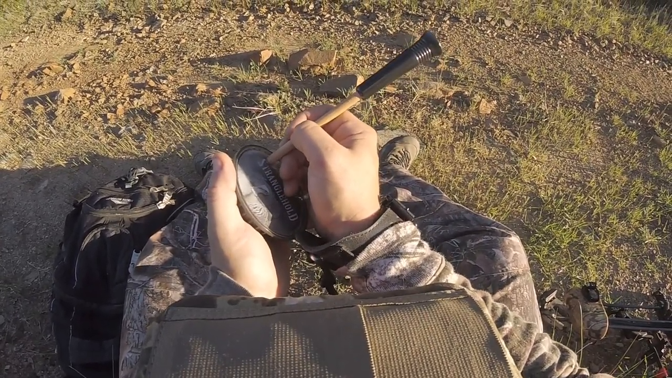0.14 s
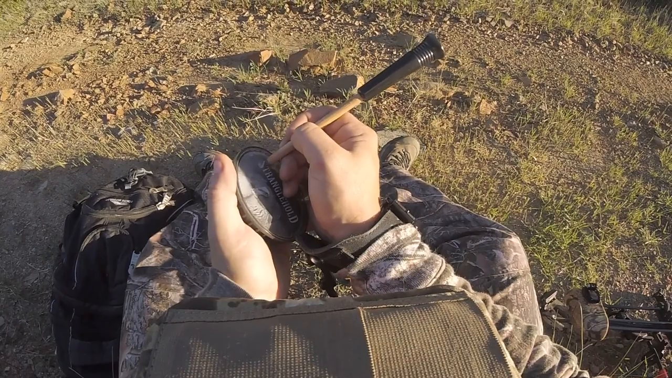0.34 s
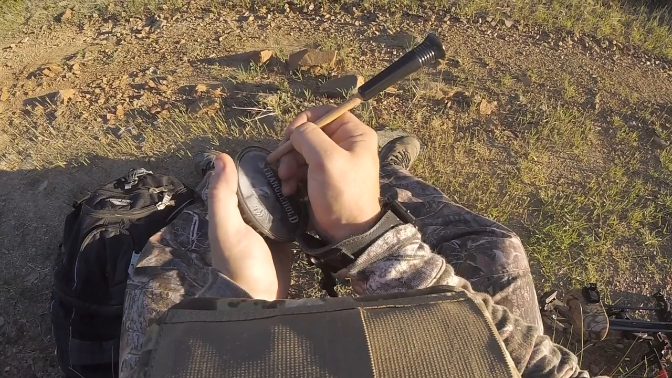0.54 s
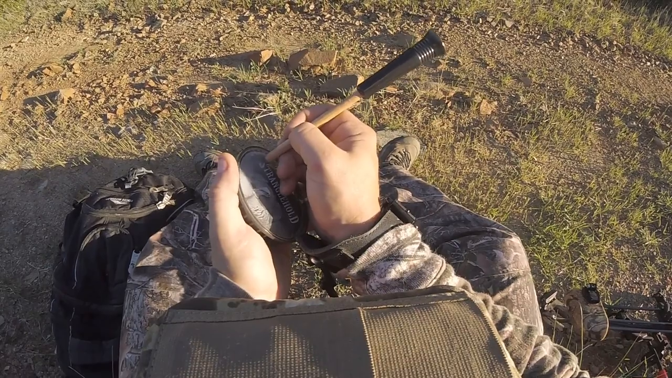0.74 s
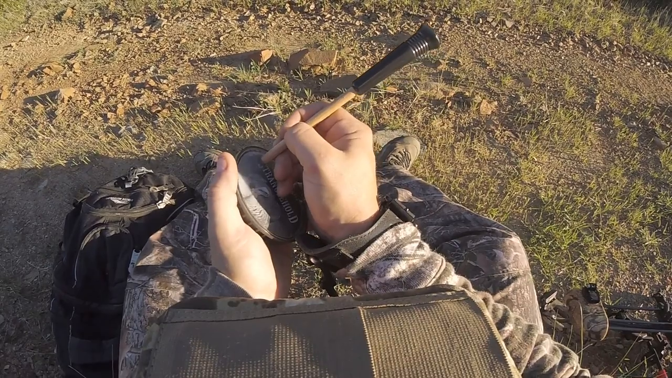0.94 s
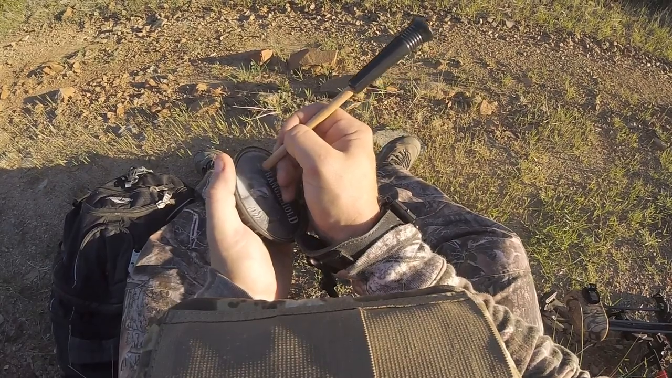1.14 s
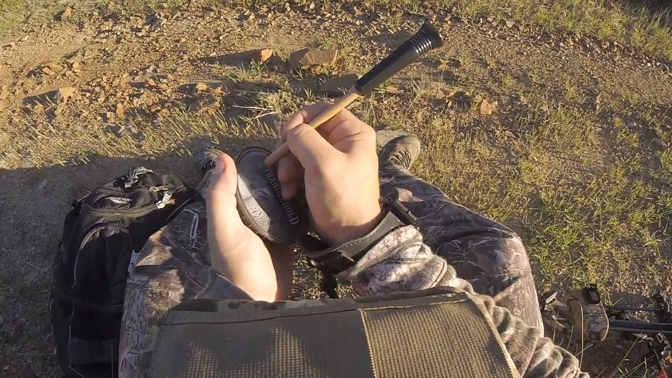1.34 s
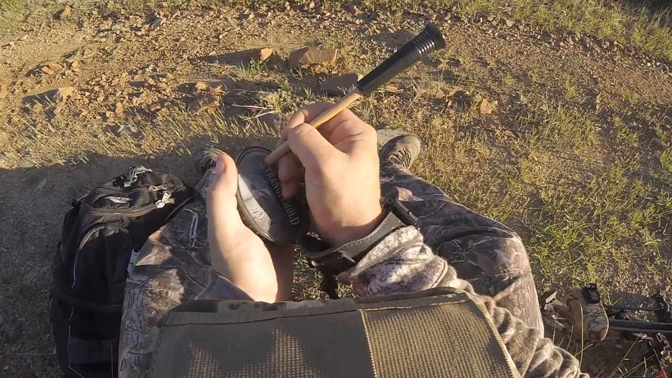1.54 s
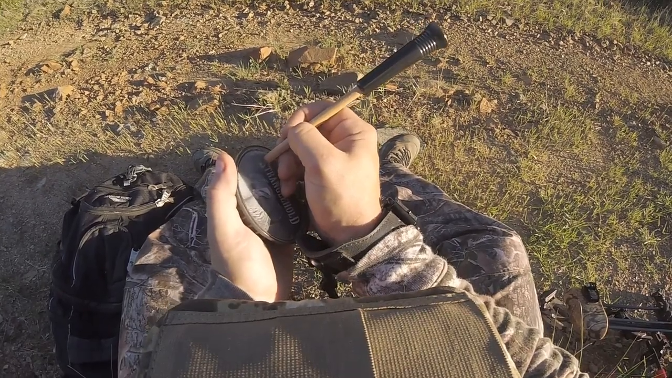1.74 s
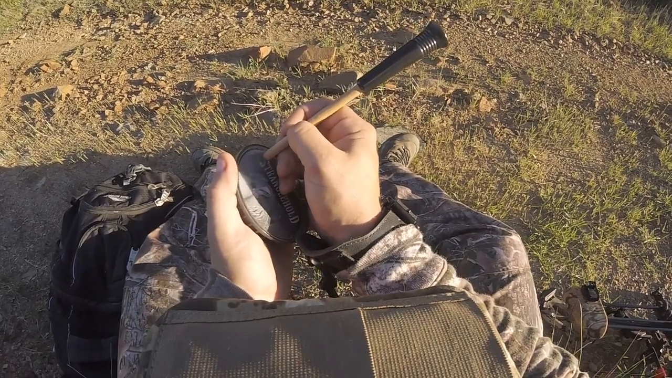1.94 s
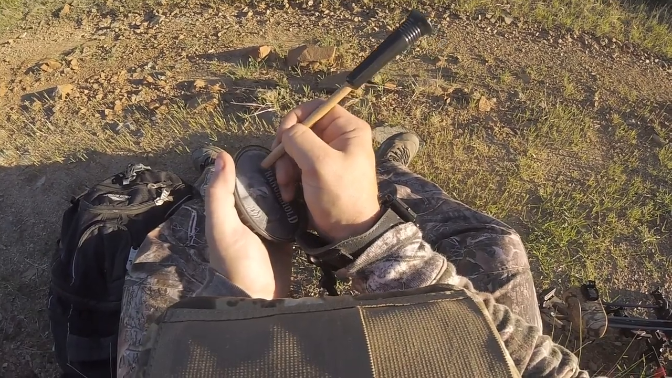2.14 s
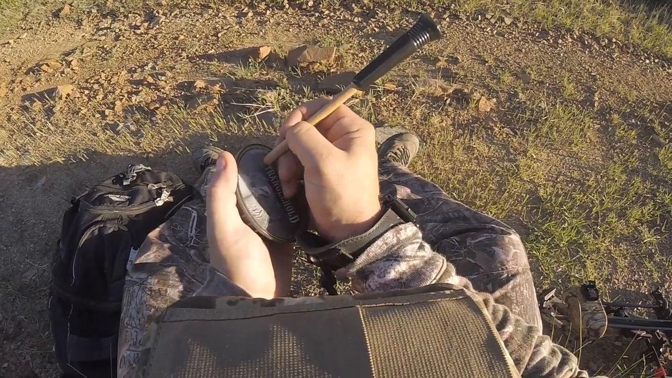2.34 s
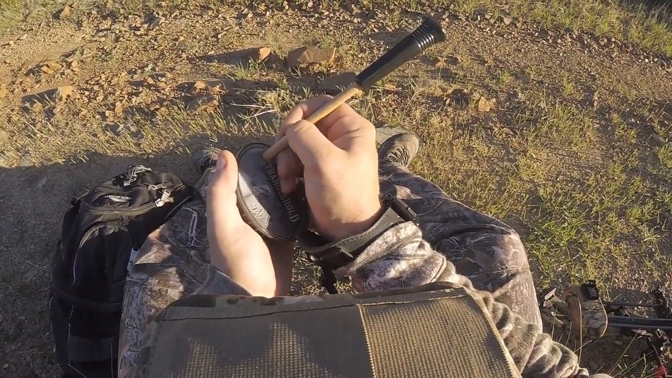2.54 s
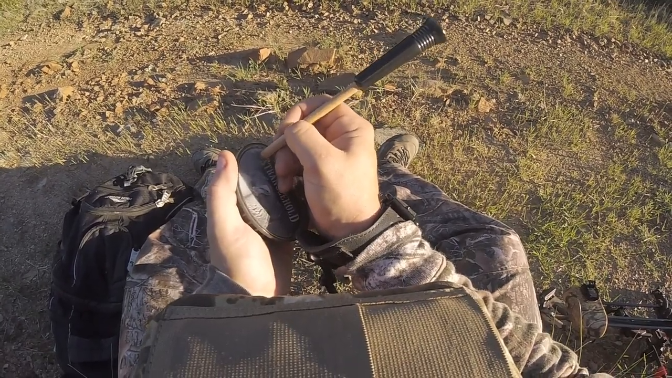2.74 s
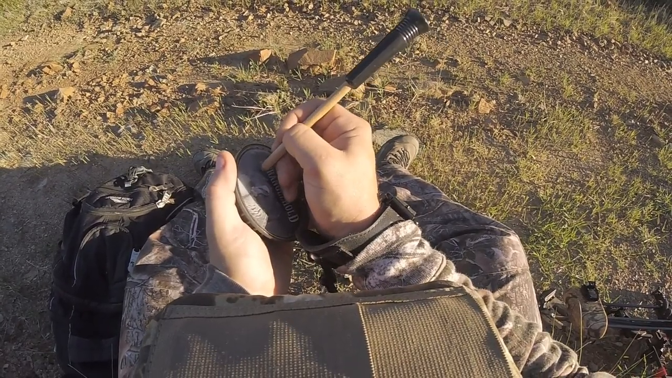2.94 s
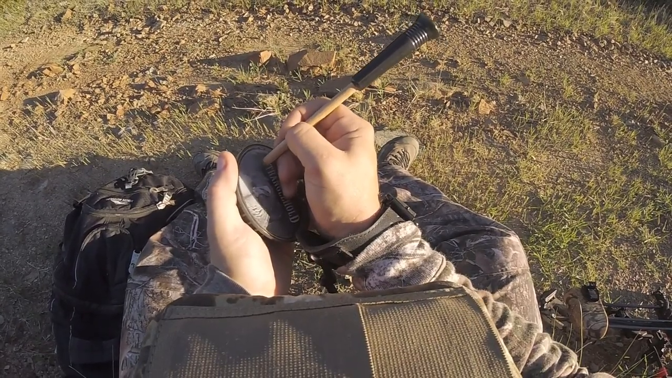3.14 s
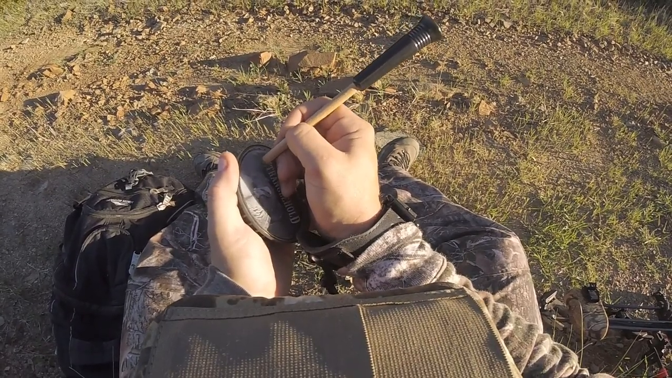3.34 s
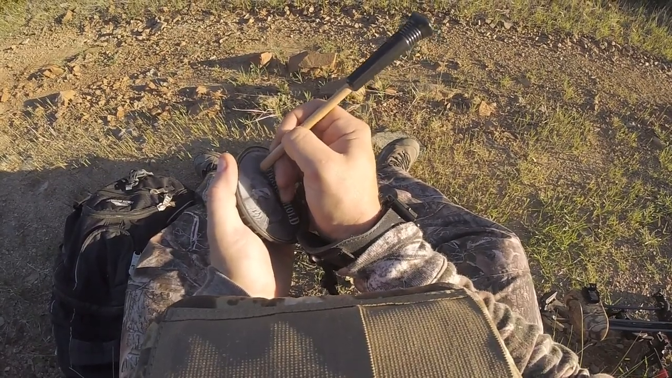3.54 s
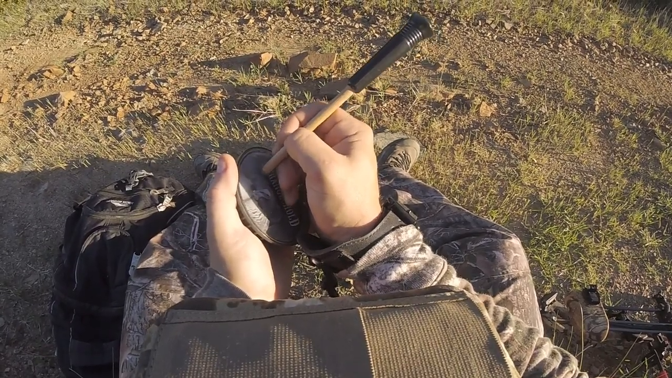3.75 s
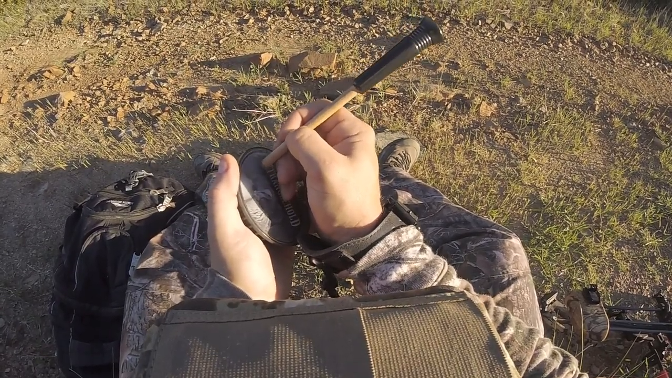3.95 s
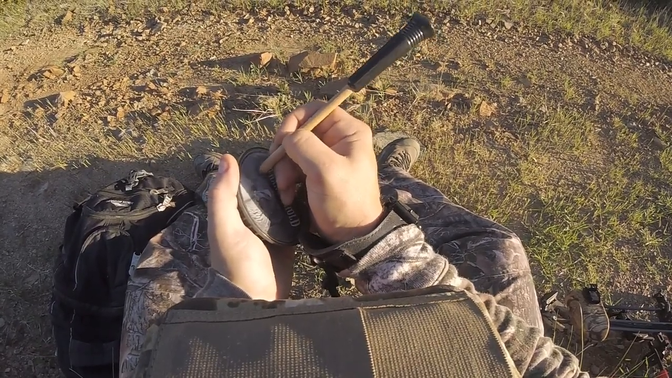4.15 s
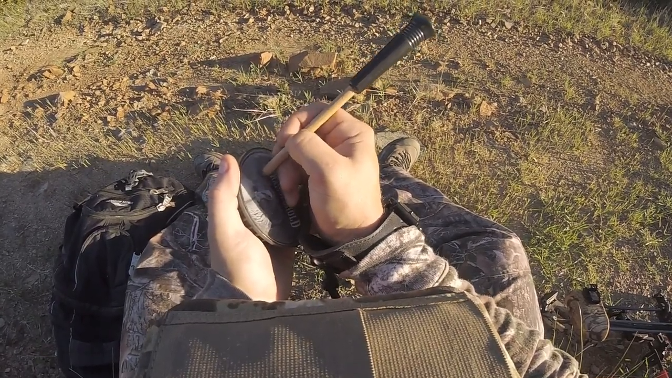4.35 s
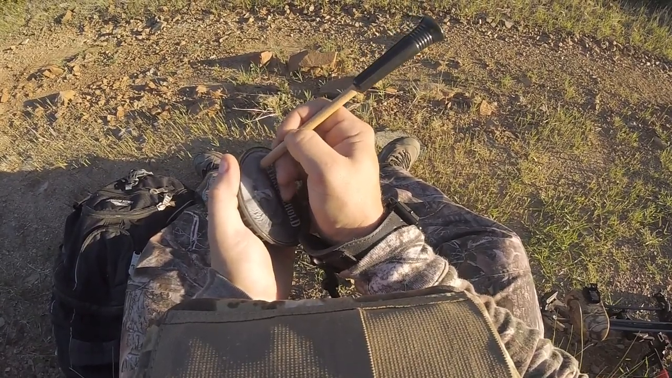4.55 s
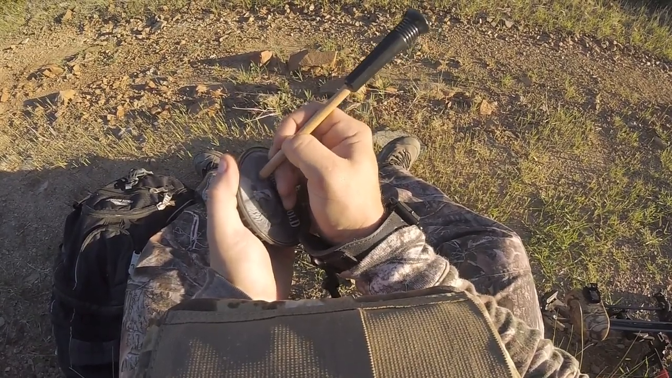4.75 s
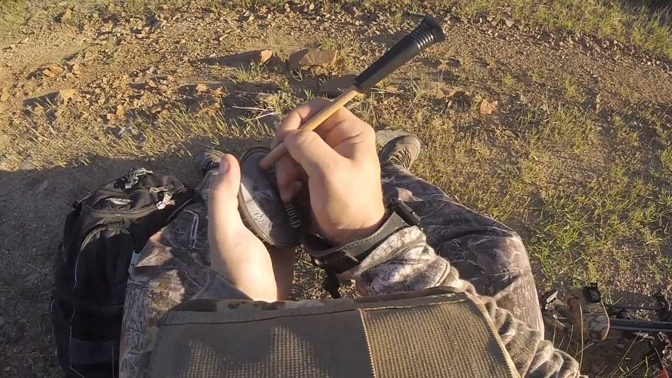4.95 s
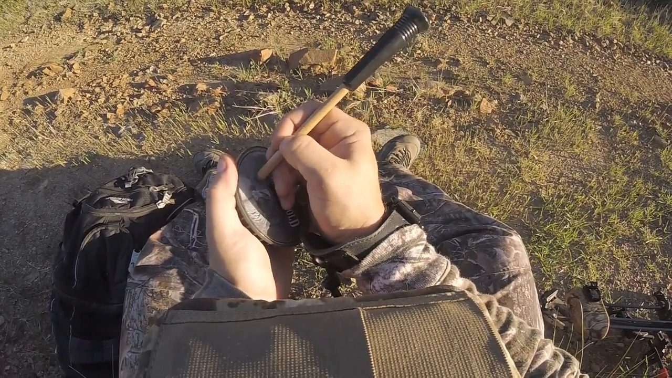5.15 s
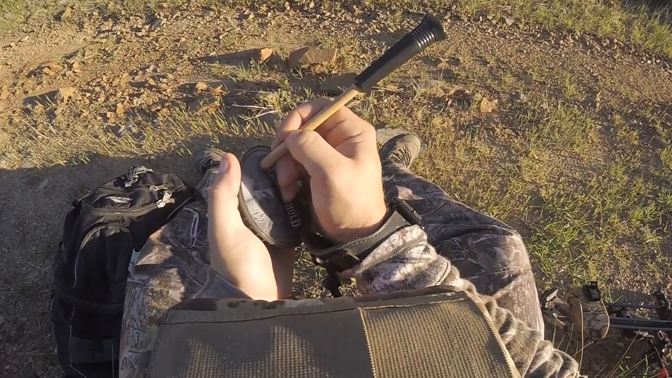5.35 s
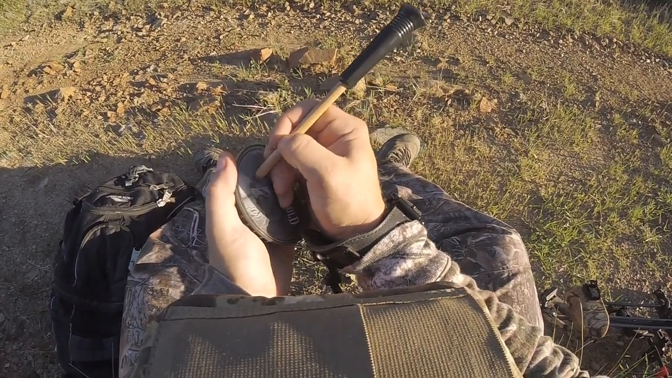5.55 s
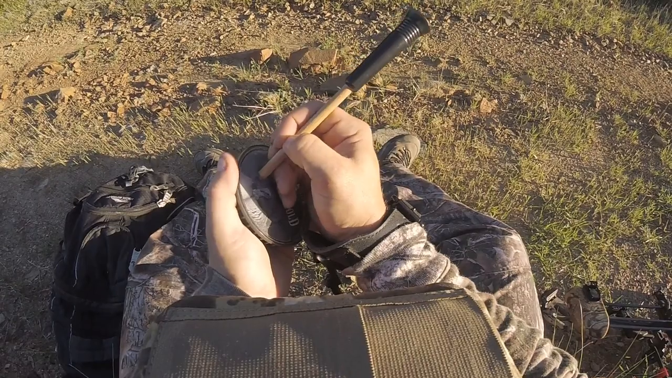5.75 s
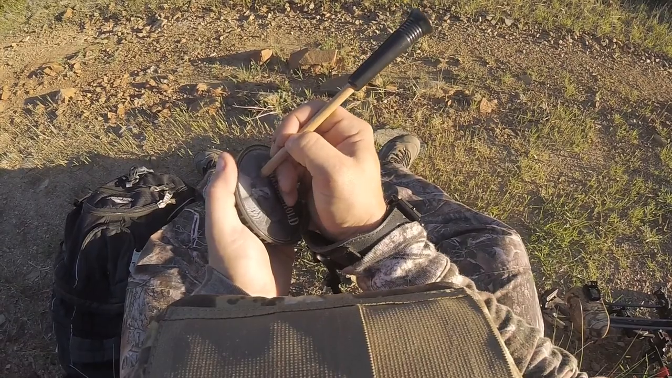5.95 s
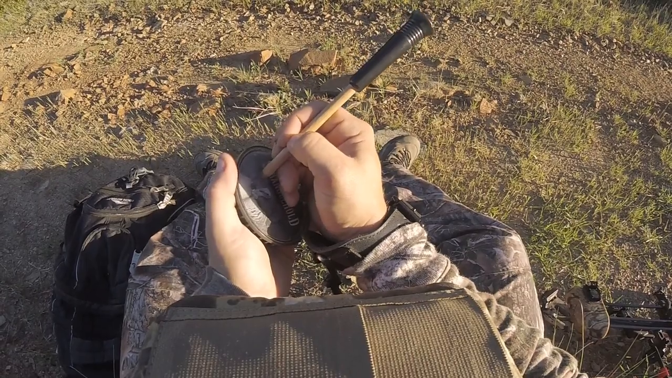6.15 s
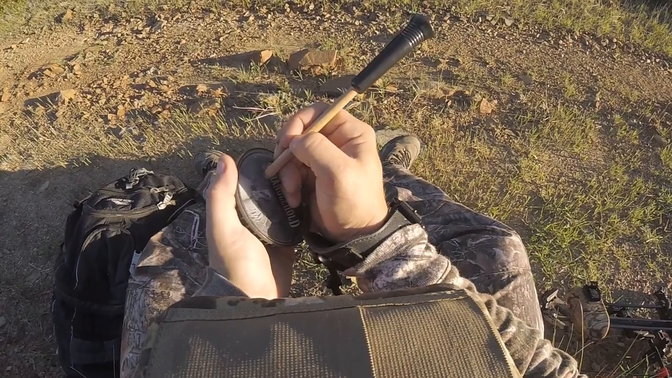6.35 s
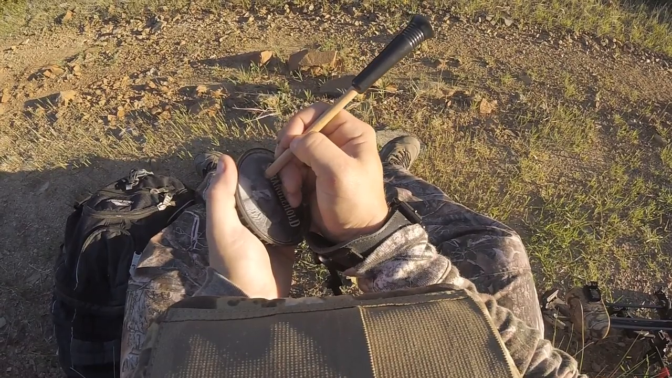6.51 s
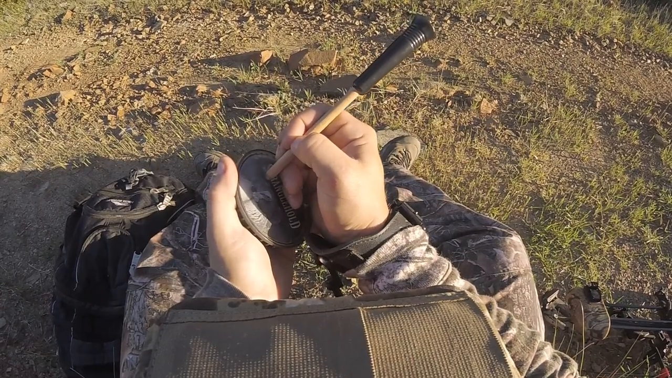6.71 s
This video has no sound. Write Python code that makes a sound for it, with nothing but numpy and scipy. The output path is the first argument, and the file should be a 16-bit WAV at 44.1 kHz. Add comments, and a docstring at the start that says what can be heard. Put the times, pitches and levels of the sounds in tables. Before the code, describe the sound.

A quiet hillside: soft low rumble and thin steady hiss. Very close, a striker touches slate faintly at 0.2 seconds and taps clearly at 0.5, followed by a light scrape. From about 0.6 to 2.4 a distant small bird sings a rapid, high twittering series that swells, then falls and fades, softly echoed. At 0.9 comes the first turkey yelp, longest, its whine breaking into a hollow, raspy low note. Shorter yelps follow at 2.1, 2.8, 3.5, 4.1, 4.6, 5.1 and 5.5, the gaps tightening, tails increasingly chattery and bright. Between them the tip slides back with grainy, dry scratches, stronger from 3.7. The background ducks under each yelp and slowly returns. A soft hand bump comes near 5.4, a clear tap at 5.6 as the last yelp ends. Then open air, with barely audible bird chips at 6.2 and 6.5, until 7.

```python
"""Quiet hillside air, low rumble and hiss; a wooden striker taps the slate of a pot call.
Far off a small bird sings a falling series of swept and arched notes; other birds add single chips.
The striker then makes eight turkey yelps: stick-slip pulses ring the pot, a high whine breaking to a raspy low note.
Between yelps the tip slides back softly, as random grains through the same resonances.
A gain control ducks everything under loud sound and recovers slowly after each yelp."""
import sys
import numpy as np
from scipy import signal
from scipy.fft import rfft, irfft
from scipy.io import wavfile
from scipy.ndimage import uniform_filter1d

SR = 44100
rng = np.random.default_rng(int(sys.argv[2]) if len(sys.argv) > 2 else 0)


def waveform_to_disk(signal):
    """Save audio, clipped to [-1, 1], as 16-bit WAV at the path in sys.argv[1]."""
    frames = np.transpose(np.atleast_2d(signal))
    scaled = np.clip(frames, -1, 1) * 32767
    samples = np.round(scaled).astype(np.int16)
    wavfile.write(sys.argv[1], SR, samples)


N = 303408
TIME = np.arange(N) / SR   # s

# strokes, each a whine that breaks into a low note, which may end in chatter; limp = long-short alternation of slips:
# start_s, attack_s, whine_s, low_s, release_s, open_hz, low_hz, close_hz, level_db,
# rasp (0-1), limp (0-1), chatter_s, chatter_rasp (0-1), upper_modes_db
STROKES = [(.868, 0.04, .1155, 0.11855, .019, 1010, 676.2, 884.8, -1.5, .11, 0, .021, 0.2, -2),
           (2.073, .014, .022, 0.11663, .008, 958.8, 656.2, 867, -1, .14, .55, 0.053, .1, -0.5),
           (2.797, 0.0046, .0065, 0.1057, .007, 879.2, 665.5, 785.5, -1, .12, .35, .034, .41, 0),
           (3.486, 0.022, .046, 0.10063, .014, 1045, 671.1, 690, 0, .08, .08, .042, .55, 0.5),
           (4.101, 0.014, .024, .074, .009, 1017, 670.4, 728.9, -1, .22, 0.1, 0.043, .55, 0),
           (4.608, .022, .028, .069, .012, 987.4, 671, 808.4, -1, .12, 0.2, .043, .7, -1.5),
           (5.072, .014, .025, .064, 0.0065, 997.1, 674.4, 735.9, -1, .17, .18, 0.035, .55, 1.5),
           (5.5, 0.0082, .012, 0.06843, 0.008975, 927.6, 681, 690.3, -2, .24, 0.3, 0.032, .62, 2)]


def from_db(db):
    """Amplitude ratio of a level in dB."""
    return 10 ** (np.asarray(db) / 20)


def rms_one(x):
    """Scales to an RMS of 1."""
    return x / np.sqrt(np.mean(x ** 2) + 1e-20)


def ramp(x):
    """Rises from 0 to 1 and stays there."""
    return np.clip(x, 0, 1)


def in_time(rows):
    """Each column of a curve, joined by straight lines."""
    s, *columns = np.transpose(rows)
    return [np.interp(TIME, s, c) for c in columns]


def drift(rate_hz):
    """Slow chance with a spread of 1: two-pole low-passed noise, made at SR / 40."""
    r = np.exp(-80 * np.pi * rate_hz / SR)
    noise = rng.standard_normal(N // 40 + 2002)
    slow = signal.lfilter([1], [1, -2 * r, r * r], noise)[2000:]   # drop the settling
    return np.interp(np.arange(N) / 40, np.arange(len(slow)), rms_one(slow))


def band(x, low_hz, high_hz, order=2):
    """Butterworth band-pass."""
    sos = signal.butter(order, [low_hz, high_hz], "band", fs=SR, output="sos")
    return signal.sosfilt(sos, x + 1e-18)


def resonate(x, modes):
    """Parallel resonances of alternating sign."""
    out = np.zeros(N)
    for k, (hz, width_hz, db) in enumerate(modes):
        r = np.exp(-np.pi * width_hz / SR)
        poles = [1, -2 * r * np.cos(2 * np.pi * hz / SR), r * r]
        gain = (-1) ** k * from_db(db) * (1 - r * r) / 2
        out += gain * signal.lfilter([1, 0, -1], poles, x + 1e-18)
    return out


def clicks(times_s, sizes):
    """Impulses placed between samples."""
    at = np.clip(np.asarray(times_s) * SR, 0, N - 2)
    i = at.astype(int)
    return np.bincount(i, sizes * (1 - at + i), N) + np.bincount(i + 1, sizes * (at - i), N)


def air(level_db=-51, waver_db=1.5753, split_hz=500):
    """Low rumble of open country, wavering a little, under a steady hiss."""
    # air and microphone hiss, relative spectral density: freq_hz, level_db
    hiss_curve = [(30, -16.5), (95, -32), (150, 3.5), (200, -1), (300, -8), (600, -14.5), (1200, -20),
                  (2200, -26), (3000, -29), (4200, -41), (5500, -37.5), (6800, -27), (10000, -31.5),
                  (15000, -44.5)]
    hz, db = np.transpose(hiss_curve)
    f = np.maximum(np.fft.rfftfreq(N, 1 / SR), 1)
    spectrum = rfft(rng.standard_normal(N)) * from_db(np.interp(np.log(f), np.log(hz), db))
    low = 1 / (1 + (f / split_hz) ** 2)
    rumble = irfft(spectrum * low, N) * from_db(waver_db * drift(3.9))
    hiss = irfft(spectrum * (1 - low), N)
    return from_db(level_db) * rms_one(rumble + hiss)


def pot(force):
    """The call's body: strong resonances in a steep band, with faint low modes below."""
    # slate over its sound chamber: freq_hz, width_hz, level_db
    slate_modes = [(1334, 170, -2.5), (1677.6, 165.7, 0.5), (2054.7, 220, -14)]
    # faint air and wall modes of the pot: freq_hz, width_hz, level_db
    low_modes = [(449, 58, -33.5), (690, 380, -41.5), (1044, 50, -29)]
    slate = band(resonate(force, slate_modes), 1241.8, 2140, order=4)
    return slate + band(resonate(force, low_modes), 300, 760)


def overtones(force):
    """The high ring of slate and striker."""
    # weaker modes of slate and striker: freq_hz, width_hz, level_db
    upper_modes = [(2503.8, 100, -20), (2760, 700, -35), (3588.4, 60, -27.5), (4887.4, 360, -37.5),
                   (5212.7, 190, -29.5), (5914, 140, -36), (6520, 290, -48.5), (8310, 150, -45),
                   (8980, 680, -57), (10850, 260, -64)]
    return band(resonate(force, upper_modes), 1800, 12500)


def knocks(rows, body):
    """Single touches ring a body; the largest peak of the whole takes the highest listed level."""
    s, db = np.transpose(rows)
    sound = body(clicks(s, from_db(db)))
    return sound / np.abs(sound).max() * from_db(db.max())


def taps():
    """The tip set down on the slate: impulses into pot and upper modes."""
    # touches of the tip: time_s, level_db
    tap_rows = [(.163, -35.5), (.462, -20.5), (4.586, -38), (4.928, -33), (5.398, -36), (5.591, -18)]
    return knocks(tap_rows, lambda x: pot(x) + from_db(-13) * overtones(x))


def bird(sweep_db=-2, arch_db=-1.0, chip_fall=0.074, waver_db=4.5):
    """Each syllable of the song falls steeply, then hooks up and over; other birds add single chips."""
    # short calls of other distant birds: start_s, pitch_hz, length_s, level_db
    chips = [(.521, 4980, 0.0077, -59), (6.162, 3360, 0.0358, -72), (6.52, 3430, 0.04777, -71)]
    sweep_s, arch_delay_s, arch_s = .031, .019, .036
    u = np.linspace(0, 1, int(sweep_s * SR))
    v = np.linspace(0, 1, int(arch_s * SR))
    sweep = 1.02 - .31 * u ** 1.6
    arch = 1.01 - .19 * (2 * v - 1.1) ** 2
    out = np.zeros(N)
    for s, top_hz, arch_hz, db in syllables():
        out += whistle(s - .004, top_hz * sweep, db + sweep_db)
        out += whistle(s + arch_delay_s, arch_hz * arch, db + arch_db)
    for s, hz, length_s, db in chips:
        fall = 1 + chip_fall * np.linspace(1, -1, int(length_s * SR))
        out += whistle(s, hz * fall, db)
    return out * from_db(waver_db * drift(40))   # the voice wavers within each note


def syllables(count=25, start_s=.605, spacing_s=.0713, drag_s=.028):
    """Onsets and pitches along the song, evenly spaced but for the last few, which drag."""
    # course of the song: time_s, sweep_top_hz, arch_hz, level_db
    song = [(0.599, 5600, 5080, -76.5), (.85, 5850, 4982, -52), (1.281, 6200, 5017, -53.5),
            (1.7, 5780, 4505, -50.5), (2.35, 5050, 3970, -66.5)]
    k = np.arange(count)
    s = start_s + spacing_s * k + drag_s * (k / k[-1]) ** 10
    at, *columns = np.transpose(song)
    return zip(s, *(np.interp(s, at, c) for c in columns))


def whistle(start_s, hz, db):
    """One softly swelling sine that follows the pitch curve."""
    out, i = np.zeros(N), int(start_s * SR)
    tone = np.sin(2 * np.pi * np.cumsum(hz) / SR)
    out[i:i + len(hz)] = from_db(db) * np.sqrt(2) * np.hanning(len(hz)) * tone
    return out


def slide(grain_db=0.5, flutter_db=0.5, catch_db=1.14):
    """Fine grains of slate tick under the lightly moving tip, in uneven clumps."""
    # the hand grows brisker through the series: time_s, skid_db, hiss_db
    briskness = [(1.1, -51.5, 2.5), (2.2, -51.5, 10), (4.1, -38.5, 16), (5.6, -37, 18.5)]
    skid_db, hiss_db = in_time(briskness)
    ticks = rng.random(N) < 4000 / SR   # 4000 grains per s
    grains = ticks * rng.standard_normal(N) * from_db(grain_db * rng.standard_normal(N))
    grains = grains * from_db(flutter_db * drift(5) + catch_db * drift(90))
    hiss = overtones(np.diff(grains, 2, prepend=[0, 0]))   # tiny contacts favour the high modes
    hiss += from_db(-45) * band(grains, 3600, 4300)   # dry scratch straight off the stone
    return sliding(skid_db) * rms_one(pot(grains) + from_db(hiss_db) * hiss)


def sliding(skid_db):
    """Strength of the light contact: return slides, a rub before each yelp grips and a skid after it."""
    # the tip sliding lightly back over the slate: start_s, length_s, level_db
    slides = [(0.578, 0.0717, -50.5), (.65, 0.1306, -51), (1.12, 0.258, -54.5), (1.326, 0.96, -61),
              (2.26, 0.54, -54), (2.98, 0.431, -52), (3.722, 0.287, -45), (4.3, 0.26, -46),
              (4.792, 0.2585, -44.5), (5.242, 0.34, -46), (5.649, .13, -56)]
    slide_attack_s, slide_release_s, sag_db = 0.028, 0.045, 8.5
    rub_db, rub_rise_db_per_s = -43.5, 259.5
    skid_hold_s, skid_fall_db_per_s = .035, 456
    power = np.zeros(N)
    for start_s, length_s, db in slides:
        t = TIME - start_s
        edges = ramp(t / slide_attack_s) * ramp((length_s - t) / slide_release_s)
        power += (edges * from_db(db - sag_db * ramp(t / length_s))) ** 2
    for start_s, attack_s, whine_s, low_s, release_s, *_ in STROKES:
        before = start_s - TIME
        after = TIME - (start_s + whine_s + low_s)
        rub = from_db(rub_db - rub_rise_db_per_s * ramp(before))
        skid = from_db(skid_db - skid_fall_db_per_s * ramp(after - skid_hold_s))
        power += (ramp(1 + before / attack_s) * rub) ** 2
        power += (ramp(1 + after / release_s) * skid) ** 2
    return np.sqrt(power)


def yelps(grit_db=-56, bite_flicker_db=2.5, even_s=.005, lead_s=0.0014):
    """Stick-slip pulses and a little grit drive the pot; the hand sets the strength of the swing."""
    force, strength, upper_db = np.zeros(N), np.zeros(N), np.zeros(N)
    for rows in map(stroke, STROKES):
        s, _, db, _, _, bright_db = np.transpose(rows)
        upper_db += np.interp(TIME, s, bright_db, left=0, right=0)
        times_s, sizes = slips(rows)
        force += clicks(times_s - lead_s, sizes)   # the pot takes a moment to follow the tip
        strength += np.interp(TIME, s, from_db(db), left=0, right=0)
    strength = np.abs(uniform_filter1d(strength, size=60))
    tone = pot(force + from_db(grit_db) * rng.standard_normal(N))
    # running level of the tone, divided out so that strength alone sets it
    swing = np.sqrt(np.abs(uniform_filter1d(tone ** 2, int(even_s * SR))) + 1e-12)
    # each slip scrapes the stone for a moment
    scrape = from_db(-18) * signal.lfilter([1], [1, -.95], force) * rng.standard_normal(N)
    # a harder swing snaps more sharply and wakes the upper modes
    snap = strength ** 1.3
    upper = overtones((force + scrape) * snap * from_db(upper_db + bite_flicker_db * drift(41)))
    return tone / swing * strength + upper / np.average(swing, weights=strength)


def stroke(yelp):
    """One stroke of the hand, as rows of time_s, slip_hz, level_db, rasp, limp, upper_modes_db."""
    (start_s, attack_s, whine_s, low_s, release_s, open_hz, low_hz, close_hz, level_db,
     rasp, limp, chatter_s, chatter_rasp, upper_db) = yelp
    # the whine swells out of a light touch and sinks to the pitch at which the tip loses its grip
    touch_db, break_hz, whine_bend, whine_swell_db = -33, 855.5, 2.1, 6
    whine_rasp, whine_limp, whine_upper_db = 0.022, .08, -5
    # the low note starts weaker, swells in the middle; its pitch rises and it fades as the hand eases off
    break_dip_db, low_swell_db, ease_db_per_hz, ease_bend = 4.5, 2.5, 0.0464, 4.0
    # limp and slowing of the slips are per unit of chatter rasp
    chatter_onset_s, chatter_limp, chatter_drag_hz = 0.0072, .55, 49.45

    length_s = whine_s + low_s
    t = np.arange(0, length_s, 1 / 2000)
    to_break = ramp((whine_s - t) / (whine_s - attack_s / 2))   # pitch sinks from halfway through the attack
    low = ramp((t - whine_s) / low_s)
    broken = ramp((t - whine_s) / .002 + .5)
    ease_hz = (close_hz - low_hz) * low ** ease_bend
    chatter = ramp((t - length_s + chatter_s) / chatter_onset_s + .5)
    catch_hz, catch_db = catches(start_s + t)
    slowed_hz = chatter_drag_hz * chatter_rasp * chatter
    edges = ramp(2 * t / attack_s) * ramp((length_s - t) / release_s)
    edges_db = touch_db * ramp(1 - t / attack_s) + 20 * np.log10(edges + 1e-3)

    def across_break(whine, low_note):
        """Crossfades from the whine's value to the low note's."""
        return whine + broken * (low_note - whine)

    whine_hz = break_hz + (open_hz - break_hz) * to_break ** whine_bend
    hz = across_break(whine_hz, low_hz + ease_hz - slowed_hz) - catch_hz
    low_db = low_swell_db * np.sin(np.pi * low) - break_dip_db - ease_db_per_hz * ease_hz
    swell_db = across_break(-whine_swell_db * to_break, low_db) + catch_db
    low_rasp = rasp + (chatter_rasp - rasp) * chatter
    low_limp = limp + (chatter_limp * chatter_rasp - limp) * chatter
    return np.transpose([start_s + t, hz, level_db + edges_db + swell_db,
                         across_break(whine_rasp, low_rasp),
                         across_break(whine_limp, low_limp),
                         upper_db + across_break(whine_upper_db, 0)])


def catches(s):
    """Pitch drop in Hz and gain in dB where the tip skips or digs in, at the times s."""
    # brief changes of pressure within a stroke: time_s, half_length_s, pitch_drop_hz, gain_db
    catch_rows = [(0.919, .003, -20.5, -11), (2.859, .014, 235, 2), (4.187, .003, -2, -15)]
    at, half_s, drop_hz, gain_db = np.transpose(catch_rows)
    depth = 1 / (1 + ((s[:, None] - at) / half_s) ** 4)
    return depth @ drop_hz, depth @ gain_db


def slips(rows, jitter=0.12, limp_shift=0.014, stumble=0.2, size_db=3.0, tremble=0.0077):
    """Times and sizes of the slips in one stroke; shifts are in slip periods."""
    s, hz, _, rasp, limp, _ = np.transpose(rows)
    t = np.arange(s.min(), s.max(), 1 / SR)
    # the grain of the stone makes the slip rate tremble
    cycles = np.cumsum(np.interp(t, s, hz) * (1 + tremble * drift(130)[:len(t)])) / SR
    k = np.arange(int(cycles[-1]))
    at = np.interp(k, cycles, t)
    hz, rasp, limp = (np.interp(at, s, c) for c in (hz, rasp, limp))
    chance = rng.standard_normal((400, 2))[:len(k)]
    # under pressure the tip catches unevenly: in twos, in threes, and at random
    late = limp_shift * limp * (-1.) ** k
    late += stumble * rasp ** 2 * np.sin(2 * np.pi * k / 3)
    late += jitter * rasp * chance[:, 0]
    return at + late / hz, from_db(size_db * rasp * chance[:, 1])


def bumps():
    """Soft bumps of hand and clothing: impulses through low band-passes."""
    # bumps: time_s, level_db
    bump_rows = [(5.4455, -31.5)]
    return knocks(bump_rows, lambda x: band(band(x, 156, 450, order=1), 144, 1500))


def hillside(x, echo_db, t60_s):
    """Faint scatter from ground and brush: convolution with decaying noise."""
    t = TIME[:SR // 2]
    scatter = rng.standard_normal(len(t)) * from_db(-60 * t / t60_s) * (t > .006)
    return x + from_db(echo_db) * signal.fftconvolve(x, scatter / np.linalg.norm(scatter))[:N]


def scene():
    """The call close by, the birds far off across the slope."""
    call = hillside(taps() + slide() + yelps(), echo_db=-35.5, t60_s=0.44)
    birds = hillside(bird(), echo_db=-7.0, t60_s=.4)
    return (air() + birds + call + bumps())[None]


def released(db, db_per_s):
    """Holds each peak and lets it sink at a steady rate."""
    return np.maximum.accumulate(db + db_per_s * TIME) - db_per_s * TIME


def record(dry, limit_db=-8.5, fast_db_per_s=70, slow_db_per_s=7.5, slow_share=0.97):
    """Gain control with a quick and a slow release, its gain smoothed, and the top cut."""
    level_db = 10 * np.log10(np.abs(uniform_filter1d(dry[0] ** 2, size=130)) + 1e-12)
    over_db = np.maximum(level_db - limit_db, 0)
    fast_db = released(over_db, fast_db_per_s)
    slow_db = released(slow_share * over_db, slow_db_per_s)
    duck_db = np.maximum(fast_db, slow_db)
    out = dry * from_db(-uniform_filter1d(duck_db, size=90))
    top_cut = signal.cheby2(14, 70, 16000, fs=SR, output="sos")   # 70 dB down from 16 kHz
    return signal.sosfilt(top_cut, out)


dry = scene()
out = record(dry)
waveform_to_disk(out)
```